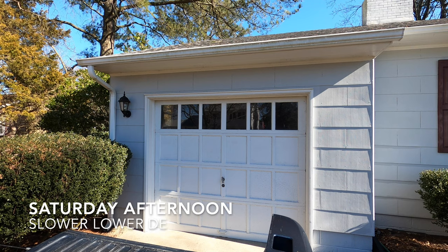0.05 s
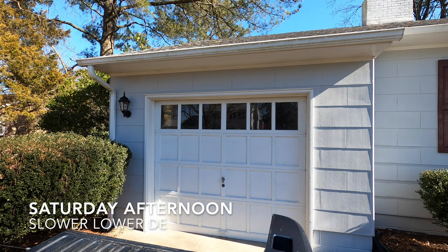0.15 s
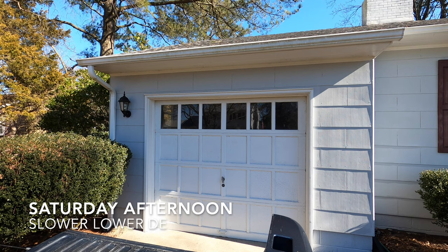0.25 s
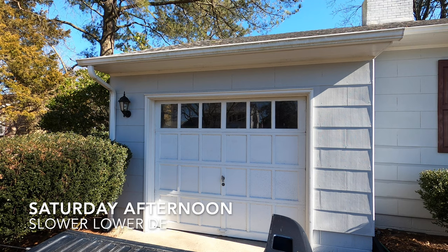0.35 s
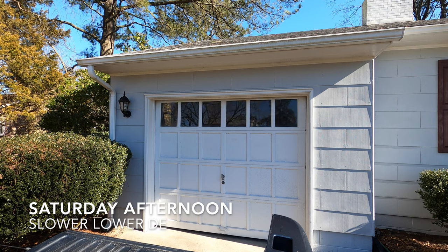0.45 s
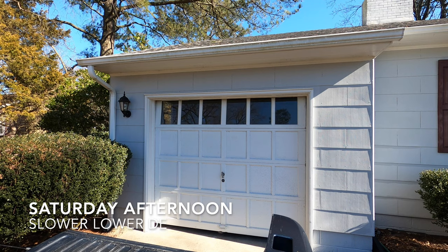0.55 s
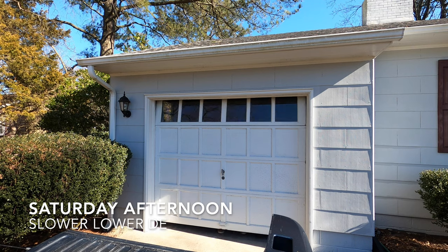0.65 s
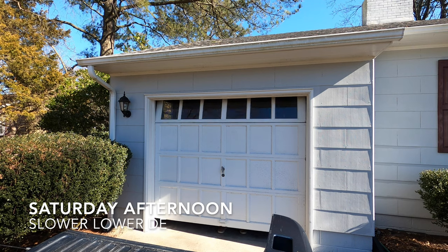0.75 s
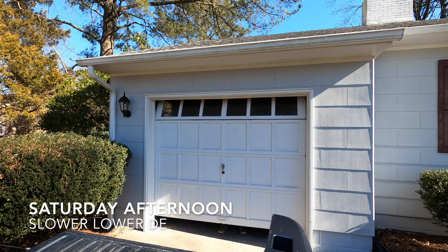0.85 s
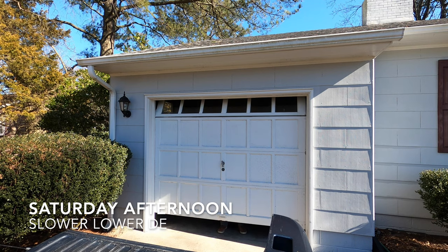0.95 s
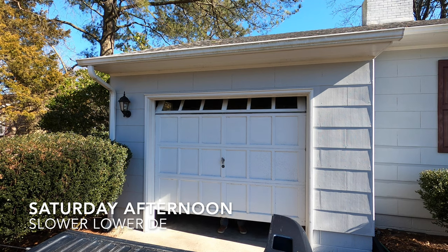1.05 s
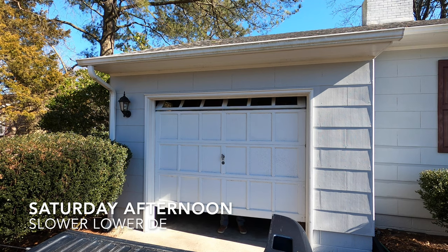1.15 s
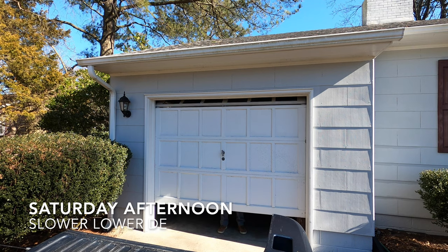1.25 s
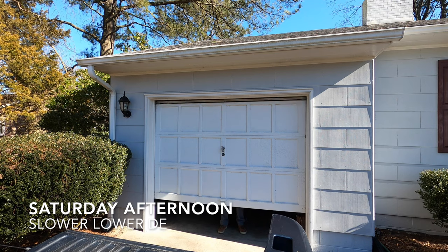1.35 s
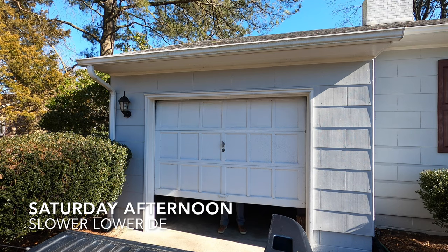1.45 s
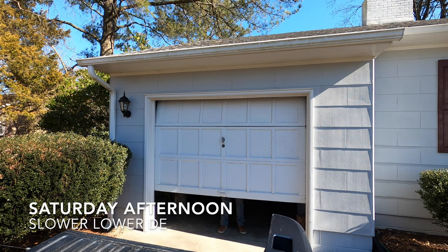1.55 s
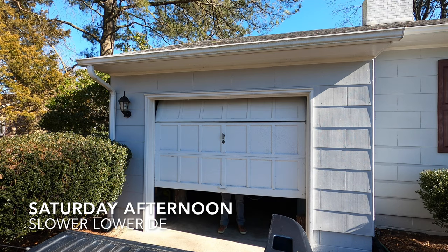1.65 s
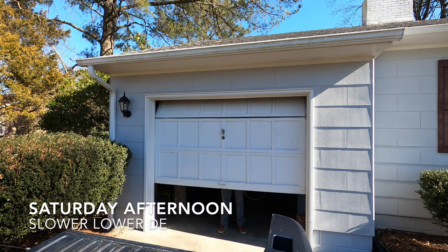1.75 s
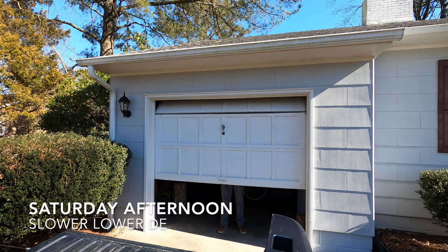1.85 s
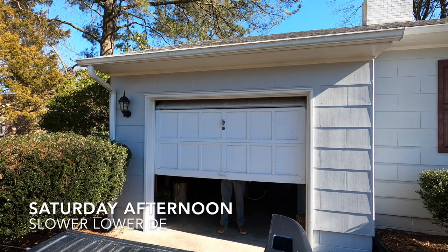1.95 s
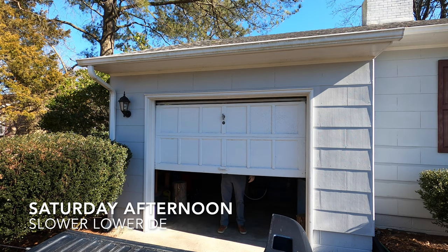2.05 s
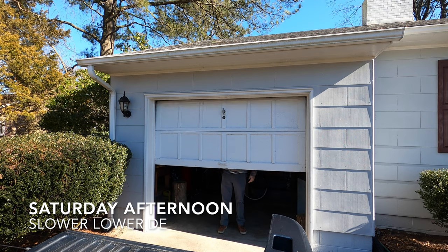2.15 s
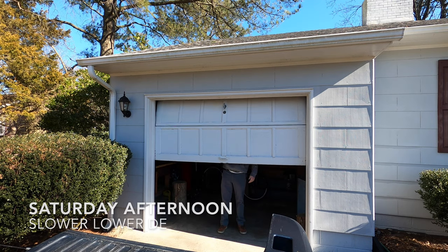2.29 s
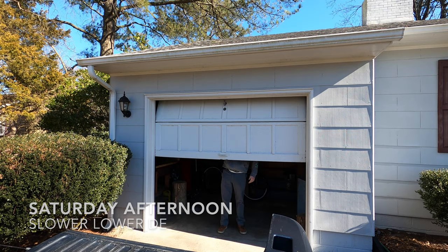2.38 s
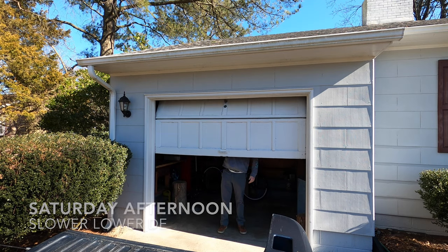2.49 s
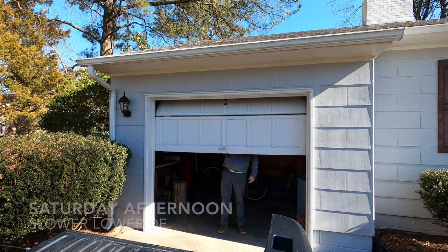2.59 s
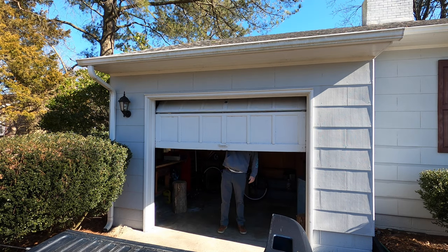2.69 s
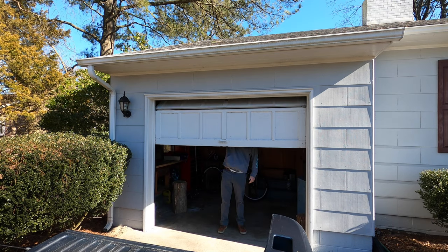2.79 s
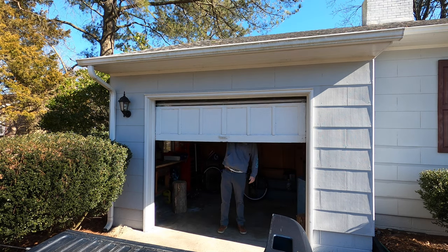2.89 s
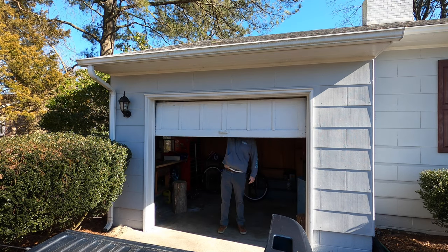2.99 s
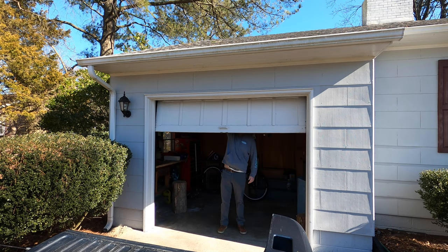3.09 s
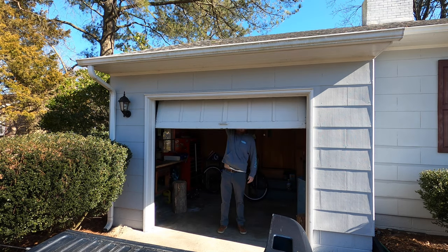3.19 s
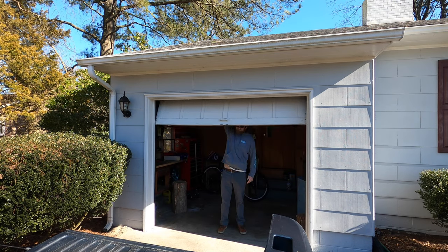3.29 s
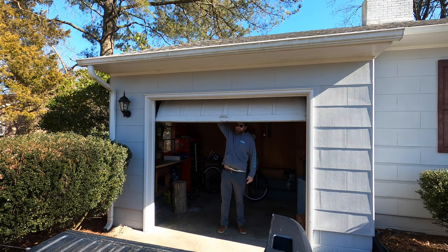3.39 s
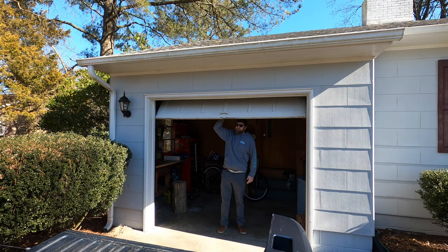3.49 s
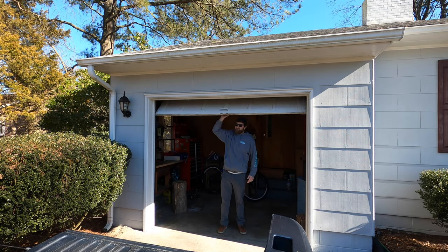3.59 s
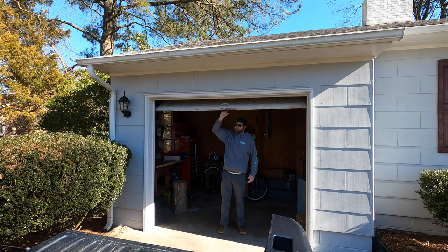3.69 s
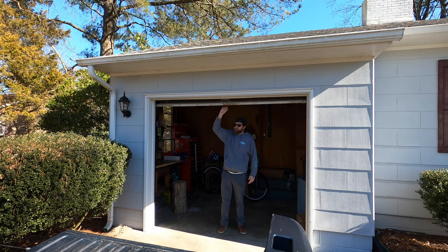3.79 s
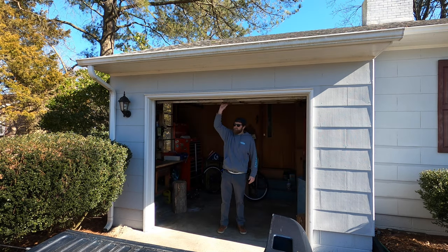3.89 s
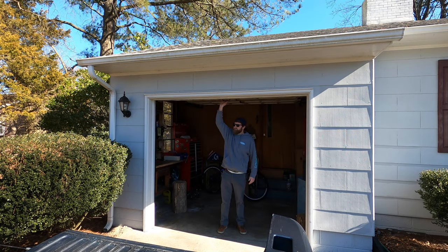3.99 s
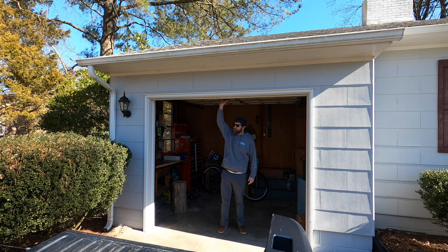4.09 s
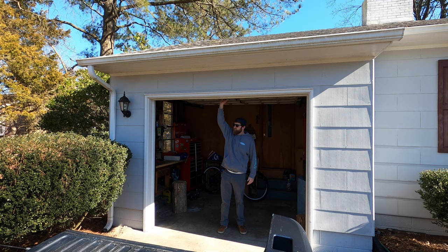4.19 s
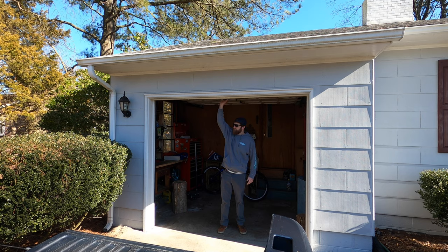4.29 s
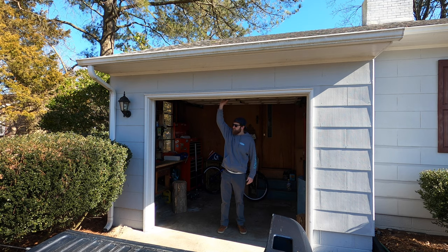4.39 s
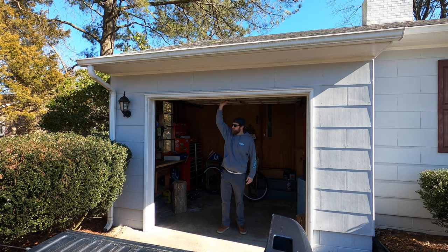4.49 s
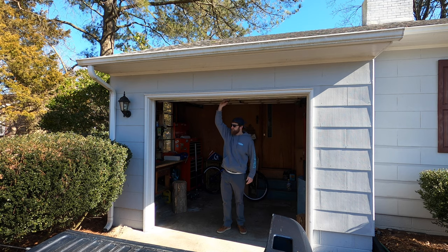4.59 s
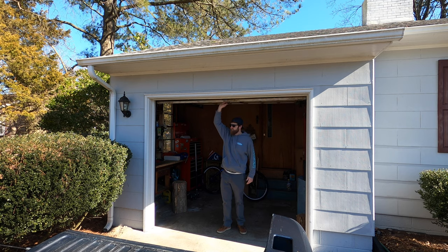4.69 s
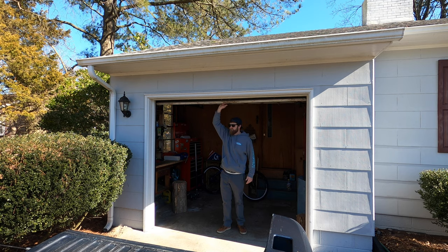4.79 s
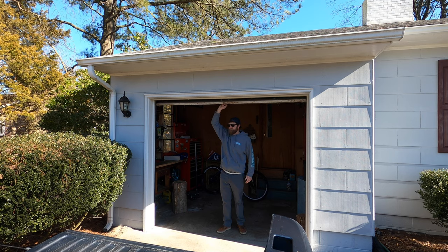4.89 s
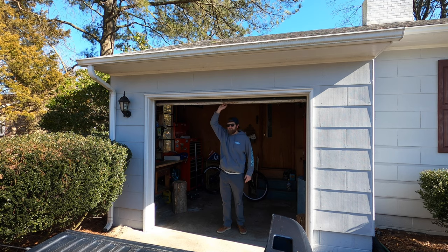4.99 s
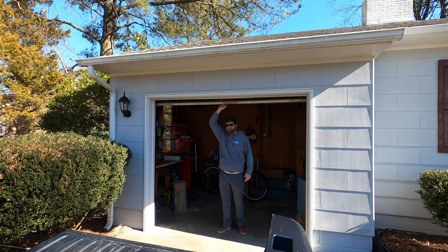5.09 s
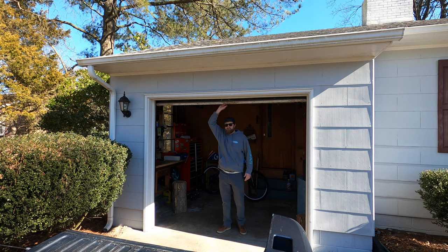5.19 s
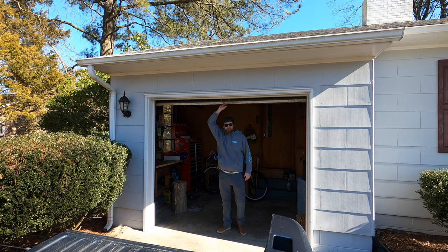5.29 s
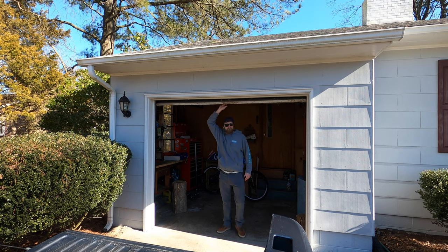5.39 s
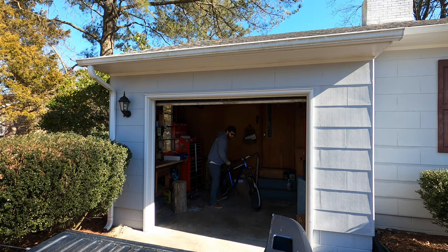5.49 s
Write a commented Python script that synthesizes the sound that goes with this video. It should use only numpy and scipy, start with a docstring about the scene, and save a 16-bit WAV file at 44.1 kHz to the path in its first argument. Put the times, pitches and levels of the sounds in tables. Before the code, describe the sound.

A sectional garage door is pushed up by hand, heard in mono with a short garage reverberation. From the start, rollers grind roughly and panels shake over low booming jolts. From about 0.5 to 1.6 seconds the rattle is strongest, with bright, uneven clacks, ringing track metal and high steely pings, the sharpest near 1.4. From about 1.7 to 2.9 seconds rolling becomes quieter, with lighter separate clacks and hollow knocks. Clacks grow harder from 3.0, peaking around 3.3 as the door nears the top, with a low boom and bright scrape. Motion dies away by about 3.8. What remains is very quiet: a wavering low hum with a weaker upper tone, soft airy stirrings, a small tick near 4.1, a dull knock near 4.65 and a clearer click near 4.86. The sound drops to complete silence at about 5.4, and the faint hum returns briefly at 5.53.

```python
"""Rollers grind and clack along steel tracks as a sectional garage door is pushed up by hand.
Grind, shake and rumble are coloured noise; clacks are noise bursts with ringing panel and track modes, and the
garage answers each one. A loose steel fitting pings in decaying sines and jolts boom in swelling low sines.
The door stops overhead, hums on in two wavering tones over soft noise and ticks in noise snaps as it settles.
The sound drops out briefly near the end."""
import sys
import numpy as np
from scipy import signal
from scipy.fft import rfft, irfft, next_fast_len
from scipy.io import wavfile
from scipy.ndimage import uniform_filter1d, map_coordinates

SR = 44100
rng = np.random.default_rng(int(sys.argv[2]) if len(sys.argv) > 2 else 0)


def to_wav(sig):
    """Store sig (one row per channel, or 1-D mono) as 16-bit WAV at the path in sys.argv[1].

    Samples outside -1..1 are clipped; the rate is SR.
    """
    pcm = np.clip(np.atleast_2d(sig), -1, 1) * 32767
    pcm = np.round(pcm).astype(np.int16)
    wavfile.write(sys.argv[1], SR, pcm.T)  # frames by channels


def voltage_ratio(decibels):
    """Convert decibels (scalar or array-like) to amplitude ratios, 20 dB per decade."""
    exponent = np.asarray(decibels, float) / 20
    return 10 ** exponent


N = 244622


def unit(x):
    """Scaled to rms 1."""
    return x / np.sqrt(np.mean(x ** 2) + 1e-20)


def along(points, hz):
    """Values between (Hz, value) points, read on a log frequency axis."""
    f, v = np.transpose(points)
    return np.interp(np.log(hz + 1), np.log(f + 1), v)


def curves(rows):
    """A gate that is open from first row to last, then one curve for each column after the time."""
    s, *columns = np.transpose(rows)
    t = np.arange(N) / SR
    gate = np.interp(t, [s[0] - 0.1, s[0], s[-1], s[-1] + 0.14], [0, 1, 1, 0])
    return [gate] + [np.interp(t, s, column) for column in columns]


def wobble(rate):
    """A smooth random curve, rate knots a second."""
    knots = rng.standard_normal(int(N * rate / SR) + 4)
    return map_coordinates(knots, [np.arange(N) * rate / SR])


def coloured(x, points, resonance=None):
    """x filtered to the (Hz, dB) points, and through a resonance if given; rms 1."""
    m = next_fast_len(len(x) + 8192)
    hz = np.fft.rfftfreq(m, 1 / SR)
    gain = voltage_ratio(along(points, hz))
    if resonance is not None:
        gain = gain * resonance(hz)
    return unit(irfft(rfft(x, m) * gain, m)[:len(x)])


def gritty(per_s, spread_db, life):
    """Noise in short bursts: small impacts of uneven size, each dying over life seconds."""
    sizes = voltage_ratio(np.minimum(spread_db * rng.exponential(size=N), 18))
    hits = (rng.random(N) < per_s / SR) * sizes
    swell = signal.lfilter([1], [1, -np.exp(-1 / (life * SR))], hits ** 2)
    return np.sqrt(swell + 1.02 * swell.mean()) * rng.standard_normal(N)


def patchy(x, patch_db):
    """Narrow bands swell and fade for a few hundredths of a second, as passing contacts wake different modes."""
    z = signal.stft(x, nperseg=512, noverlap=384)[2]
    field = uniform_filter1d(rng.standard_normal(z.shape), size=2, axis=0)  # smooth over frequency
    field = uniform_filter1d(field, size=7, axis=1)  # and over time
    return signal.istft(z * voltage_ratio(patch_db * unit(field)), nperseg=512, noverlap=384)[1][:len(x)]


def burst(colour_db, t60, length):
    """Noise whose bands die at their own speeds, rms 1 at the start."""
    hz, frame_s, z = signal.stft(rng.standard_normal(length), SR, nperseg=256, noverlap=224)
    level_db = colour_db(hz)[:, None] - 60 * frame_s / t60(hz)[:, None]
    x = signal.istft(z * voltage_ratio(level_db), SR, nperseg=256, noverlap=224)[1][:length]
    return x / np.std(x[:SR // 200])


def ringing(modes, t, scatter_db):
    """Modes struck once: decaying sines, each at a new strength and slightly new pitch."""
    hz, db, t60 = np.transpose(modes)[..., None]
    luck = rng.standard_normal((len(modes), 2))
    level_db = db + scatter_db * luck[:, :1] - 60 * t / t60
    pitch_hz = hz * (1 + 0.0036 * luck[:, 1:])
    return np.sum(voltage_ratio(level_db) * np.sin(2 * np.pi * pitch_hz * t), axis=0)


def tone(hz, unsteady, rate):
    """A tone of about rms 1, part of it fluttering in size and phase."""
    flutter = wobble(rate) + 1j * wobble(rate)
    flutter /= np.sqrt(np.mean(abs(flutter) ** 2))
    share = np.clip(unsteady, 0, 1)
    envelope = np.sqrt(1 - share) + np.sqrt(share) * flutter
    return np.sqrt(2) * np.real(envelope * np.exp(2j * np.pi * np.cumsum(hz) / SR))


def add_at(out, start_s, sound):
    """Mixes a sound into out from its start time."""
    out[round(start_s * SR):][:len(sound)] += sound


def rest():
    """A wavering hum with a weaker upper tone, over soft stirrings of filtered noise."""
    # hum left at rest: time_s, level_db, upper_tone_db
    hum_levels = [(3.8, -64, -81), (4.1, -61.5, -84), (4.24, -64.5, -78), (4.36, -60, -71), (4.6, -57, -72),
                  (4.76, -59.5, -70), (4.86, -52, -65), (5.0, -53.5, -77), (5.2, -52.5, -63.5),
                  (5.3, -64, -65), (5.39, -60, -67), (5.526, -57, -61), (5.547, -53, -58)]
    # air and small stirrings at rest: time_s, level_db
    stir_levels = [(3.7, -71), (3.94, -78), (4.1, -69.5), (4.25, -75.5), (4.33, -74), (4.61, -75),
                   (4.68, -68), (4.81, -71.5), (4.87, -64.5), (5.03, -72), (5.26, -73), (5.38, -67),
                   (5.526, -68.5), (5.537, -60.5), (5.547, -62)]
    # colour of the low air: frequency_hz, relative_db
    low_colour = [(18, -52), (30, -30), (60, -21), (82, -10.5), (100, -13.5), (160, -17.5), (240, -22.5),
                  (330, -21.5), (700, -30), (1400, -35.5), (2400, -67.5)]
    # colour of the high air: frequency_hz, relative_db
    high_colour = [(710, -19), (1200, 0.5), (3120, -8.5), (3590, -10), (6280, -17), (10500, -27),
                   (13000, -40)]

    still, hum_db, upper_db = curves(hum_levels)
    drifting_hz = 130 + 1.2 * wobble(5)
    hum = voltage_ratio(hum_db) * tone(drifting_hz, unsteady=0.04, rate=13)
    upper = voltage_ratio(upper_db) * tone(np.full(N, 214), unsteady=0.3, rate=15)

    quiet, stir_db = curves(stir_levels)
    pivot_db = -72
    low_db = pivot_db + 10 + 0.8 * (stir_db - pivot_db)  # the low air swings less than the high
    low = voltage_ratio(low_db) * coloured(rng.standard_normal(N), low_colour)
    high = voltage_ratio(stir_db) * coloured(patchy(rng.standard_normal(N), patch_db=3.5), high_colour)
    return still * (hum + upper) + quiet * (low + high)


def ticks():
    """The settling door's dry ticks: short bright snaps of noise with hardly any ring."""
    # ticks: start_s, level_db
    tick_times = [(3.901, -76), (3.9749, -74), (4.0133, -74), (4.0368, -73), (4.0727, -55), (4.75, -71),
                  (4.8627, -60.5), (5.094, -76), (5.132, -77), (5.3189, -72), (5.3468, -70)]
    # colour of a tick: frequency_hz, relative_db
    tick_colour = [(530, -70), (900, -38), (1300, -10.5), (2830, -5.5), (3160, -14), (4190, -8),
                   (4690, -22), (6640, -7.5), (13200, -33.5)]
    out = np.zeros(N + SR)
    for start_s, level_db in tick_times:
        snap = burst(lambda hz: along(tick_colour, hz), lambda hz: 0.1 + 0 * hz, SR // 8)  # t60 0.1 s
        add_at(out, start_s, voltage_ratio(level_db) * snap)
    return out[:N]


def boom():
    """The panels' lowest mode swells with every jolt of the door and dies away, slowly at first."""
    # jolts: start_s, pitch_hz, level_db, length_s
    jolts = [(0.005, 74.6, -38, 0.11), (0.085, 114, -28, 0.068), (0.175, 131, -32, .07),
             (0.215, 125.3, -33.5, .12), (0.402, 113, -41, 0.11), (0.632, 127, -31.5, 0.091),
             (0.831, 104.3, -38, .2), (1.081, 139.6, -33.5, .14), (1.183, 150.6, -25, 0.086),
             (1.215, 122, -31.5, .14), (1.363, 117.7, -24, 0.27), (1.545, 139, -43, .1),
             (1.97, 135.5, -41, 0.16), (2.179, 151, -40, 0.13), (2.425, 134, -32.5, .13),
             (2.52, 131.5, -35, 0.12), (2.61, 135, -39, 0.16), (2.739, 149, -41, 0.088),
             (2.854, 139, -35.5, 0.13), (2.94, 135.3, -41, .15), (3.128, 132.7, -39, .18),
             (3.26, 132, -32.5, 0.13), (3.34, 126.7, -26.5, 0.11), (3.439, 112, -31, 0.089),
             (3.513, 125, -40, 0.13), (3.62, 129.7, -45.5, 0.19)]
    rise_s, fade_db = 0.016, 30  # fade_db is lost over a jolt's length
    out, t = np.zeros(N + SR), np.arange(SR // 2) / SR
    rise = 1 - np.exp(-(t / rise_s) ** 2)
    for start_s, hz, level_db, length_s in jolts:
        fading = voltage_ratio(level_db - fade_db * (t / length_s) ** 2)
        add_at(out, start_s, fading * rise * np.sin(2 * np.pi * hz * t))
    return out[:N]


def rollers():
    """Rough wheels and bearings rattle the resonant tracks; the panels shake and rumble along."""
    # the door's run: time_s, roller_grind_db, panel_shake_db, low_rumble_db
    run_levels = [(0.0, -38.5, -40.5, -45), (0.08, -41, -38.5, -45), (0.2, -44.5, -39, -39.5),
                  (0.47, -43, -41, -48.5), (0.57, -36, -36.5, -45), (0.72, -34, -33, -41),
                  (1.05, -35, -36, -44), (1.15, -32.5, -32.5, -39), (1.38, -34.5, -35, -35),
                  (1.55, -40, -40.5, -40.5), (1.75, -49, -45.5, -50.5), (1.96, -46.5, -42, -52),
                  (2.3, -48, -41, -50.5), (2.4, -44, -43, -46.5), (2.69, -46.5, -40, -49),
                  (3.06, -47, -42, -46.5), (3.25, -45.5, -38, -45), (3.33, -39.5, -34.5, -36),
                  (3.48, -46.5, -38.5, -42.5), (3.83, -72.5, -62, -62)]
    # track resonances the rollers excite: centre_hz, width_hz, peak_db
    track_peaks = [(1040, 280, -3), (2220, 250, -1.5), (3100, 300, -1.5), (4030, 360, 2), (4460, 210, 8),
                   (7200, 200, -0.5)]
    # brief scrapes that lift the fizz: centre_s, half_width_s (to 1/e of the lift), lift_db
    scrapes = [(0.062, 0.029, 12), (0.21, .03, 7), (0.67, 0.027, 2.5), (1.36, 0.076, 6.5), (1.49, .03, 4.5),
               (1.62, 0.035, 5), (2.35, 0.026, 3.5), (3.37, 0.043, 7)]
    # colours of the four layers: frequency_hz, relative_db
    grind_colour = [(410, -27), (700, -3), (1040, -4.5), (2030, -2.5), (2830, -7), (3970, -10.5),
                    (5250, -30.5), (6500, -29.5), (8450, -47.5), (14300, -120)]
    fizz_colour = [(2940, -18.5), (5000, -5), (5290, -4.5), (7410, -5.5), (7710, -8), (11000, -14),
                   (13200, -27)]
    shake_colour = [(100, -34.5), (170, -6), (225, -6), (274, -2.5), (398, 1), (484, -0.5), (536, -2.5),
                    (727, -9), (919, -10.5), (1100, -13.5), (1430, -25), (2420, -120)]
    rumble_colour = [(13, -65), (22, -36.5), (59, -14), (91, -8), (114, -3), (128, -3), (176, -7.5),
                     (200, -12), (260, -38), (440, -120)]

    def track(hz):
        return 1 + sum((voltage_ratio(db) - 1) / (1 + (2 * (hz - centre) / width) ** 2) for centre, width, db in track_peaks)

    moving, grind_db, shake_db, rumble_db = curves(run_levels)
    t = np.arange(N) / SR
    grit = patchy(gritty(270, spread_db=2.0, life=0.0056), patch_db=2.5)  # one rattle drives both bands
    grind = voltage_ratio(grind_db) * coloured(grit, grind_colour, track)

    scrape_db = sum(db * np.exp(-((t - s) / width) ** 2) for s, width, db in scrapes)
    pivot_db = -42
    fizz_db = pivot_db - 16 + 1.11 * (grind_db - pivot_db) + scrape_db  # harder rolling is brighter
    fizz = voltage_ratio(fizz_db) * coloured(grit, fizz_colour, track)

    shaking = gritty(60, spread_db=-2.0, life=0.024)
    shake = voltage_ratio(shake_db + 0.81 * wobble(20)) * coloured(shaking, shake_colour)
    rumble = voltage_ratio(rumble_db + 2.5 * wobble(8)) * coloured(rng.standard_normal(N), rumble_colour)
    return moving * (grind + fizz + shake + rumble)


def pings():
    """A loose steel fitting rings in high, closely spaced modes at each ping."""
    # pings: start_s, level_db (before the trim below)
    ping_times = [(0.529, -43), (0.6, -41.5), (1.0919, -35.5), (1.3772, -23.5), (1.475, -31.5),
                  (1.6929, -48), (2.3355, -46.5), (3.137, -50)]
    # modes of the fitting: pitch_hz, relative_db, t60_s
    fitting_modes = [(7290, -1, 0.18), (7360, -3.5, 0.11), (7560, -4.5, .06), (8040, -8, 0.18),
                     (9640, -18.5, 0.199), (11660, -20, .2), (12400, -25.5, .2)]
    out, t = np.zeros(N + SR), np.arange(SR // 3) / SR
    for start_s, level_db in ping_times:
        add_at(out, start_s, voltage_ratio(level_db - 7) * ringing(fitting_modes, t, scatter_db=3.0))
    return out[:N]


def clacks():
    """Each blow: a bright crack, a fading rattle in the garage, a panel knock and a ring of the track."""
    # clacks: start_s, level_db, tilt_db_per_octave, knock_db (relative), favoured_ring_hz
    blows = [(0.0118, -37, -2, 3, 4450), (0.0392, -29.5, 4, 3.5, 2880), (0.1794, -36.5, -2.5, -8, 2900),
             (0.3049, -37.5, -0.5, 5, 2590), (0.476, -36.5, -5.5, -6, 3200), (0.5305, -30, -2, 0, 3400),
             (0.5838, -22, 9, -0.5, 3184), (0.6494, -23.5, 3.5, -12.5, 4470), (0.7886, -33.5, 6, -2, 2840),
             (0.835, -25, 0.5, -1.5, 2970), (1.0243, -33.5, -1.5, -4, 3244), (1.0921, -26, 8.5, 6, 3630),
             (1.1277, -24, 5.5, -11, 3540), (1.3069, -28.5, 7.5, -3.5, 3950), (1.3268, -24, 10, -4.5, 4000),
             (1.3681, -23, -2.5, -4, 4490), (1.3768, -22, 7.5, 0.5, 3890), (1.4754, -29, 7, -2, 4420),
             (1.5664, -34, -5, -12, 3100), (1.5959, -31, 5, -2, 3180), (1.6264, -29.5, 3.5, -5, 3320),
             (1.6939, -39.5, 2, -5, 3940), (1.7888, -33.5, -1, -4, 4060), (1.8576, -32.5, -2, 3, 3930),
             (1.941, -38, 6, 5.5, 3060), (2.0186, -42.5, 4.5, -7, 3030), (2.0692, -40.5, -1.5, -2, 2650),
             (2.154, -33.5, -4, -1.5, 2990), (2.3325, -33.5, 3.5, 1, 3360), (2.4224, -33, 1.5, 6, 4160),
             (2.497, -38, -2, 6.5, 3060), (2.5618, -37.5, 1.5, 5, 3740), (2.7736, -40, -3.5, 3, 4070),
             (2.819, -37.5, 0, -4, 2607), (2.8485, -32.5, 1, -2, 2606), (2.9235, -31.5, 0, 5, 3460),
             (2.9789, -31.5, 0.5, 4, 3970), (3.0665, -26.5, -2.5, 2, 2500), (3.1348, -26, -2, -0.5, 3200),
             (3.2029, -27, 2.5, 0.5, 2720), (3.2715, -24.5, 4.5, -2, 3200), (3.3091, -23, 8.5, -6.5, 4540),
             (3.3415, -21.5, 2, -3, 6230), (3.4376, -34, 1, -3.5, 3410), (3.7664, -53, -3, -2, 3400),
             (4.0726, -55.5, 3, -1, 2850), (4.6514, -57, -17, 8.5, 3260), (4.8355, -64, 9, -6, 3200),
             (4.8612, -46.5, 4, -8, 3200)]
    # modes of the steel track: pitch_hz, relative_db, t60_s
    steel_modes = [(2020, 6, 0.13), (2290, -3, 0.11), (3060, -1, .09), (3290, -6.5, 0.11),
                   (3450, -4.5, 0.052), (3970, -0.5, 0.19), (4160, -1, 0.083), (4540, -1, .1),
                   (5100, -11.5, .06), (6230, 3.5, 0.1), (6850, -5, 0.086)]
    # panel modes under a knock: pitch_hz, relative_db, t60_s
    panel_modes = [(209, -11, 0.17), (342, -11, 0.076), (406, -1.5, 0.18), (481, -2, 0.16),
                   (585.5, -9, 0.18), (791, -9, 0.079)]
    # colour of a clack: frequency_hz, relative_db
    crack_colour = [(410, -40.5), (700, -1), (1430, -7.5), (2390, -2), (2740, -11.5), (3130, -5.5),
                    (3410, -7.5), (4700, -12), (5310, -18), (13200, -47.5)]
    # typical decay of the garage: frequency_hz, t60_s
    garage_decay = [(500, 0.23), (2000, 0.33), (5000, 0.25), (12000, 0.13)]

    def octaves(hz):
        return np.log2(np.clip(hz, 700, 9000) / 3000)

    def uneven(hz, spread_db):  # every blow wakes other modes
        return spread_db * rng.standard_normal(len(hz))

    out, t = np.zeros(N + SR), np.arange(SR // 3) / SR
    for start_s, level_db, tilt_db, knock_db, ring_hz in blows:
        rattle = burst(lambda hz: along(crack_colour, hz) + tilt_db * octaves(hz) + uneven(hz, 4.0),
                       lambda hz: along(garage_decay, hz) * voltage_ratio(uneven(hz, 2.7)), len(t))
        crack = burst(lambda hz: along(crack_colour, hz) + (tilt_db + 3.0) * octaves(hz),
                      lambda hz: 1 + 0 * hz, len(t))
        crack *= voltage_ratio(-60 * t / 0.014)
        knock = ringing(panel_modes, t, scatter_db=4.5) * (1 - np.exp(-t / 0.0013))
        # the spot struck favours its own modes: 25 dB lost per octave away
        struck = [(hz, db - 25 * abs(np.log2(hz / ring_hz)), t60) for hz, db, t60 in steel_modes]
        ring = ringing(struck, t, scatter_db=4)

        blow = voltage_ratio(-9.0) * rattle
        blow += voltage_ratio(-10 + 0.3 * tilt_db) * crack  # brighter blows crack harder
        blow += voltage_ratio(knock_db - 8.0) * knock
        blow += voltage_ratio(-13.5) * ring
        add_at(out, start_s, voltage_ratio(level_db) * blow)
    return out[:N]


def scene():
    """Door, tracks and garage together, in one channel."""
    return (rest() + ticks() + boom() + rollers() + pings() + clacks())[None]


def low_pass(x):
    """Removes everything above the highest recorded frequency."""
    return signal.sosfilt(signal.butter(12, 13320, fs=SR, output="sos"), x)


def record(dry):
    """The sound fades out, falls silent and comes back."""
    # the silence: start_s, end_s
    dropout = (5.392, 5.525)
    t = np.arange(N) / SR
    before = np.clip((dropout[0] - t) / 0.008, 0, 1)
    after = np.clip((t - dropout[1]) / 0.0064, 0, 1)
    return low_pass(dry * (before + after))


dry = scene()
out = record(dry)
to_wav(out)
```